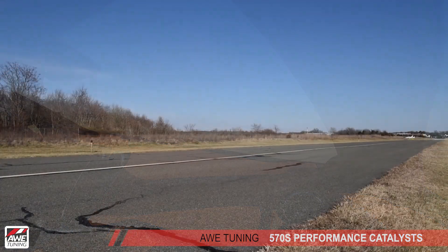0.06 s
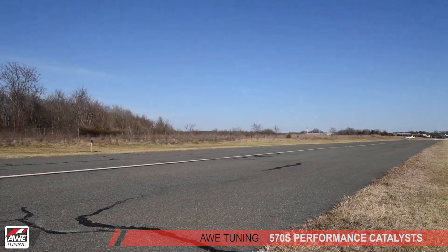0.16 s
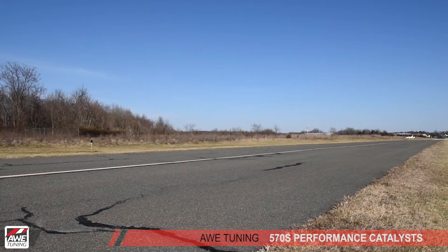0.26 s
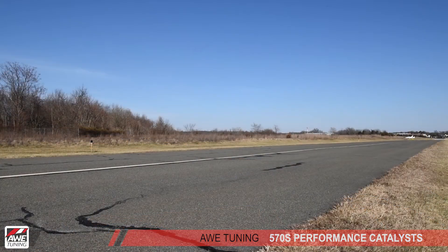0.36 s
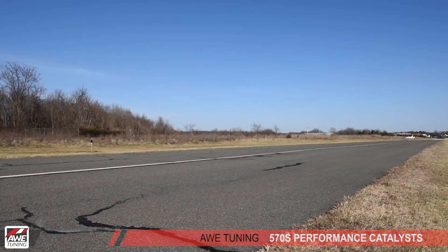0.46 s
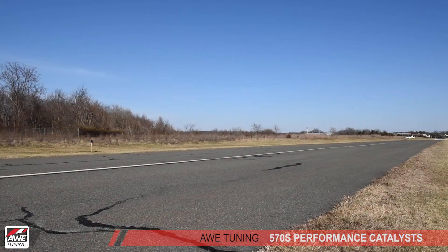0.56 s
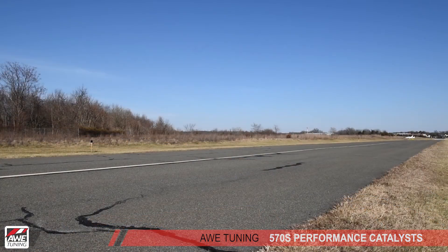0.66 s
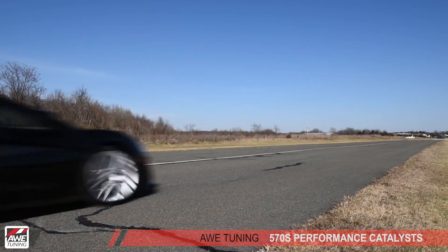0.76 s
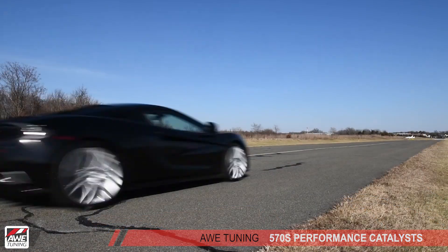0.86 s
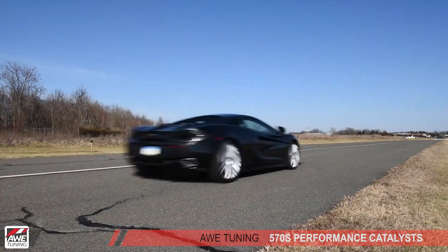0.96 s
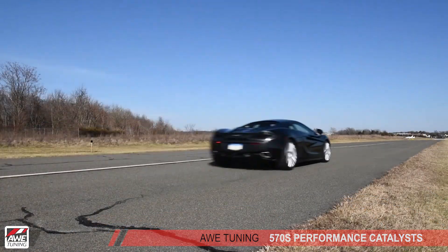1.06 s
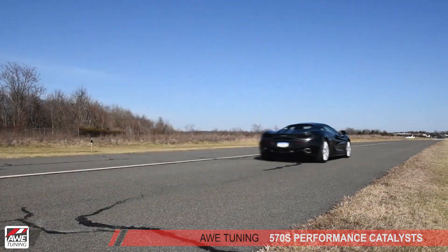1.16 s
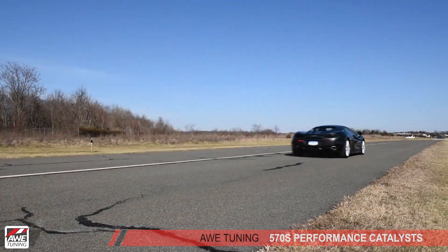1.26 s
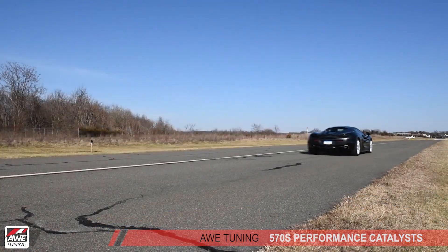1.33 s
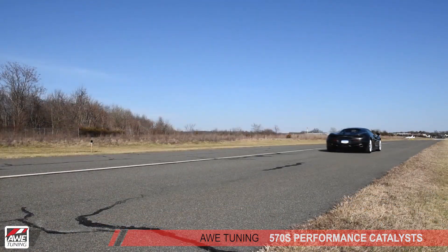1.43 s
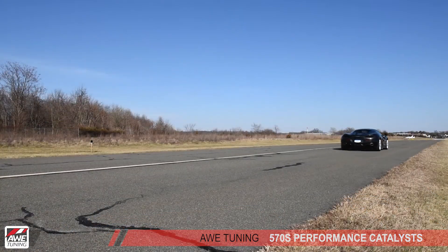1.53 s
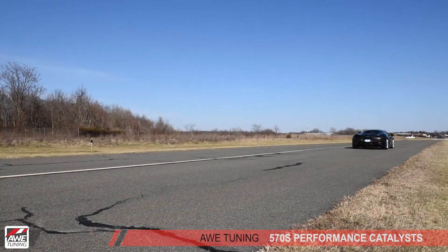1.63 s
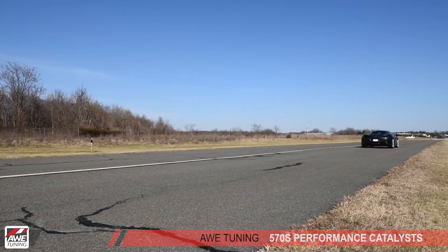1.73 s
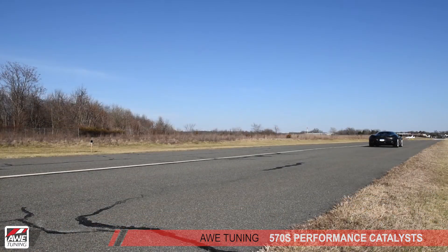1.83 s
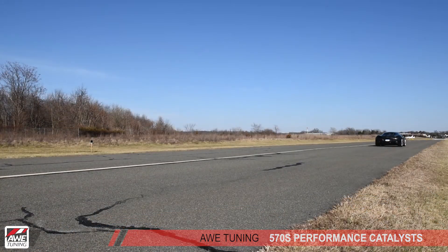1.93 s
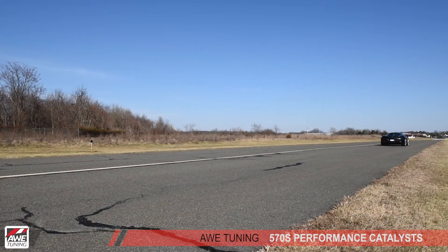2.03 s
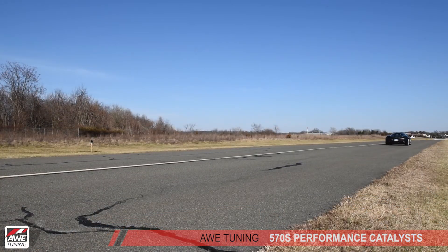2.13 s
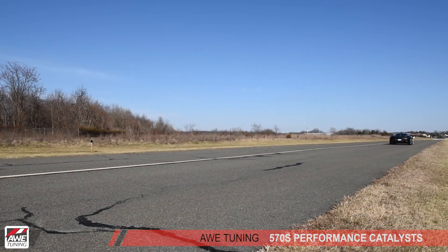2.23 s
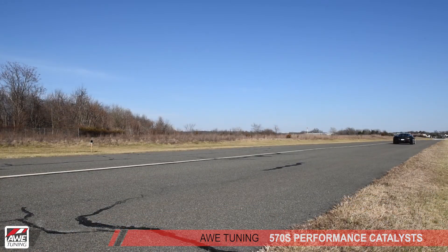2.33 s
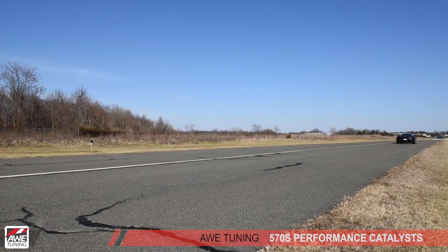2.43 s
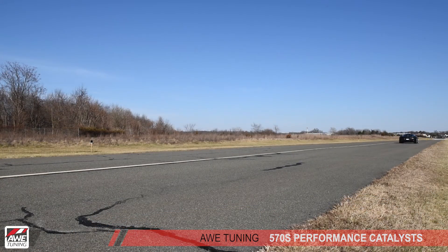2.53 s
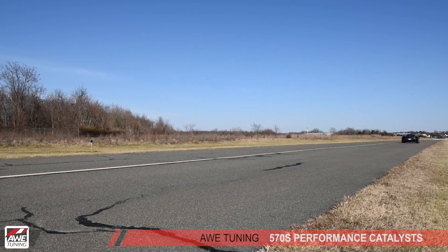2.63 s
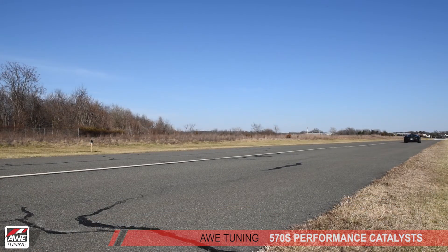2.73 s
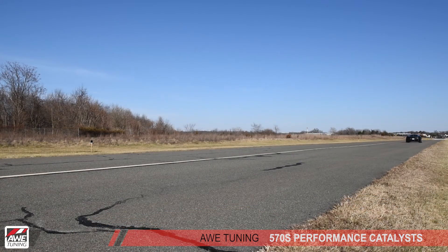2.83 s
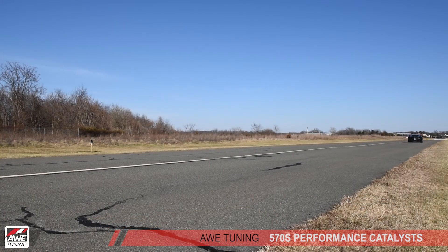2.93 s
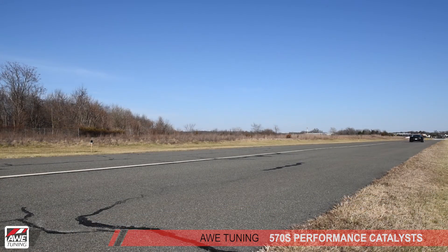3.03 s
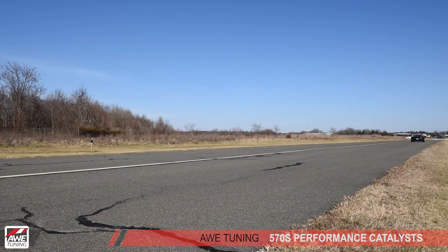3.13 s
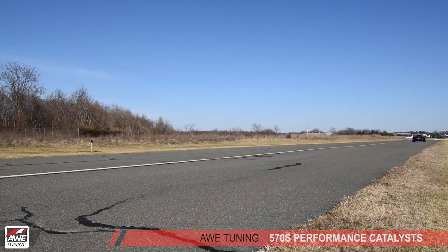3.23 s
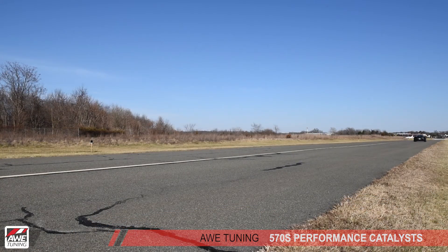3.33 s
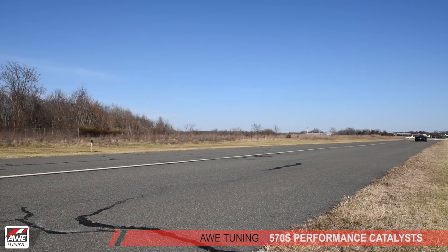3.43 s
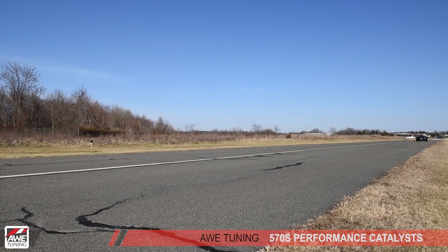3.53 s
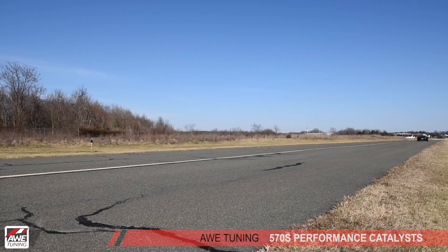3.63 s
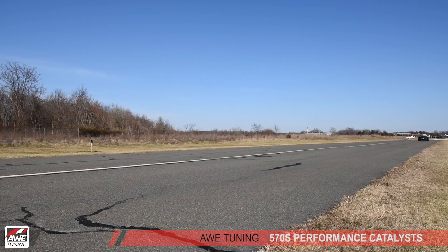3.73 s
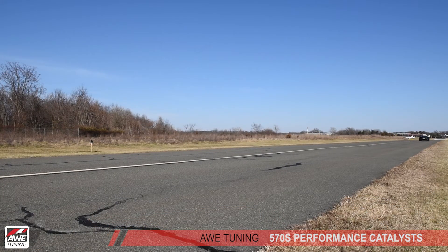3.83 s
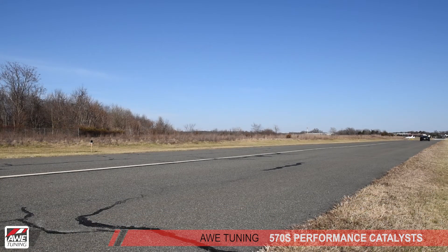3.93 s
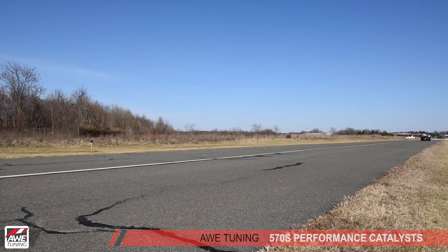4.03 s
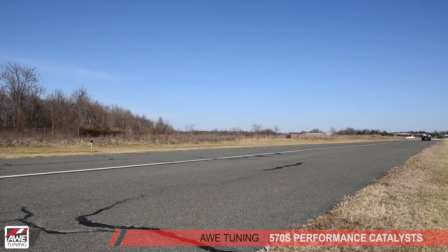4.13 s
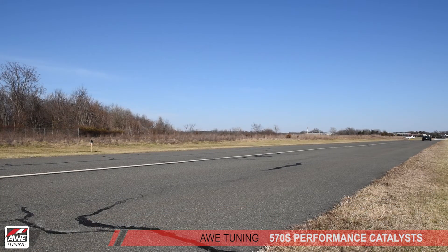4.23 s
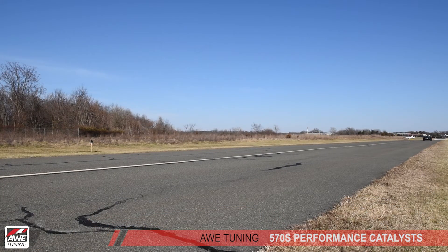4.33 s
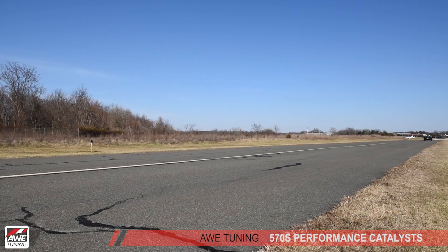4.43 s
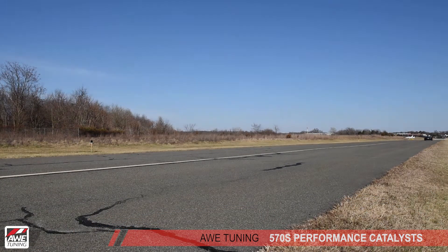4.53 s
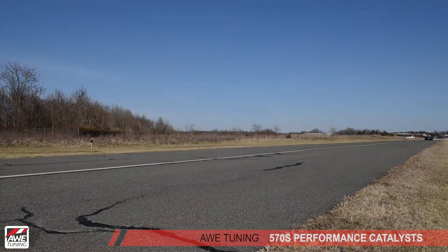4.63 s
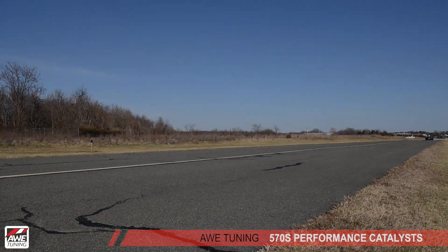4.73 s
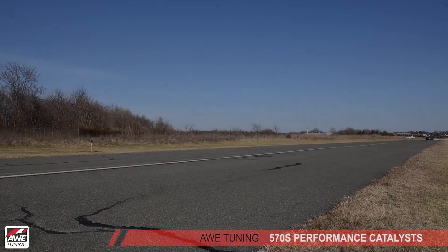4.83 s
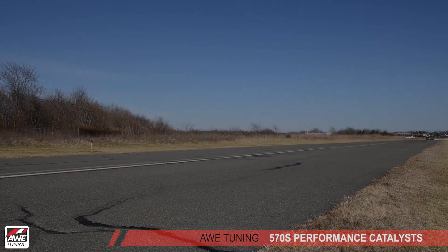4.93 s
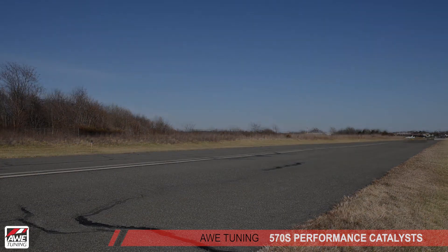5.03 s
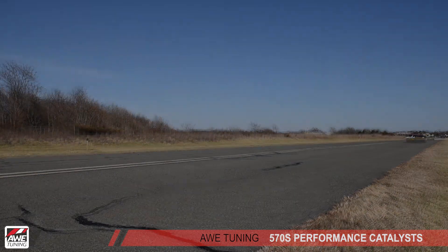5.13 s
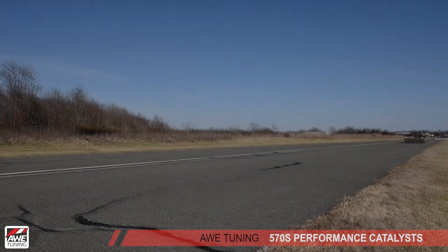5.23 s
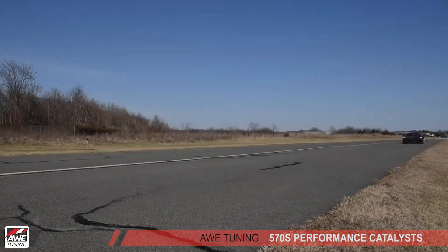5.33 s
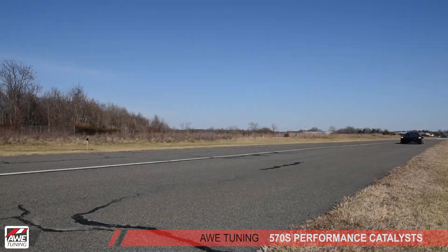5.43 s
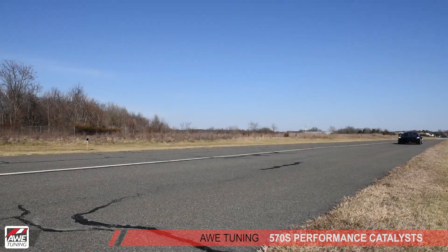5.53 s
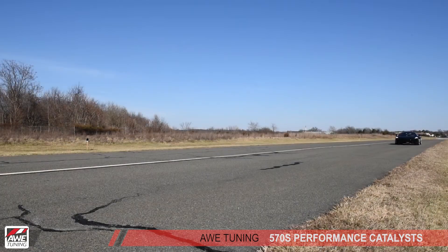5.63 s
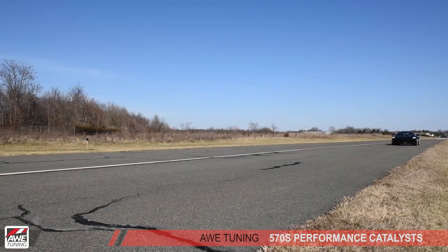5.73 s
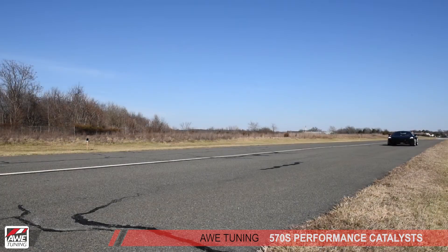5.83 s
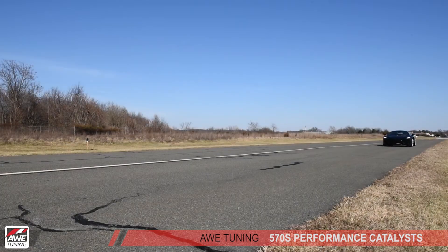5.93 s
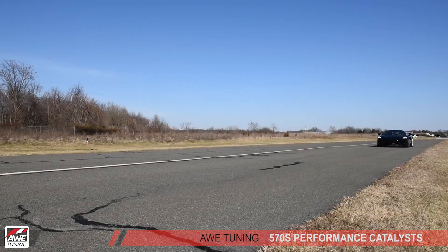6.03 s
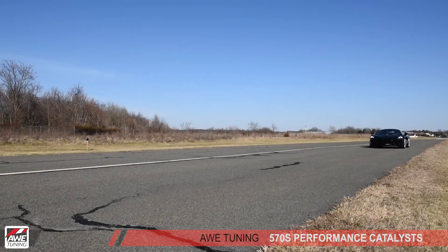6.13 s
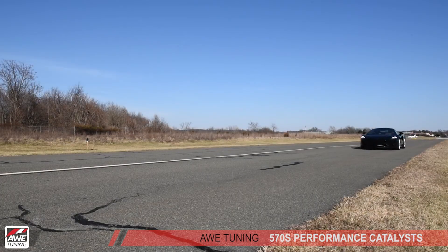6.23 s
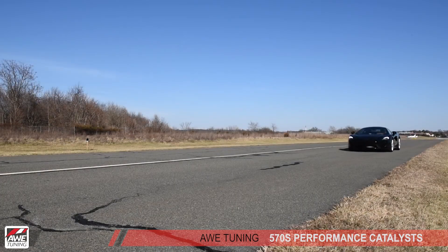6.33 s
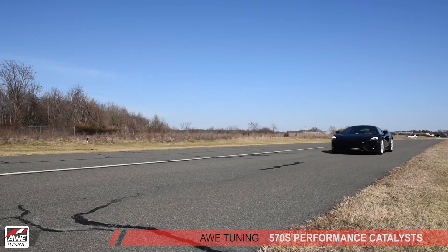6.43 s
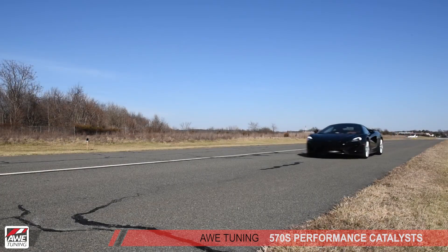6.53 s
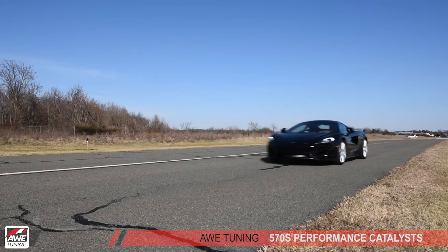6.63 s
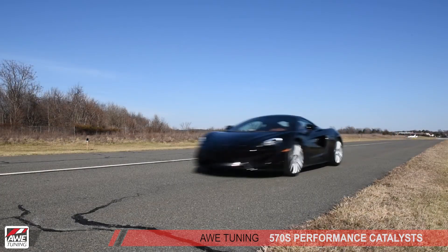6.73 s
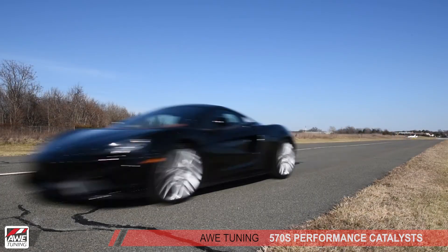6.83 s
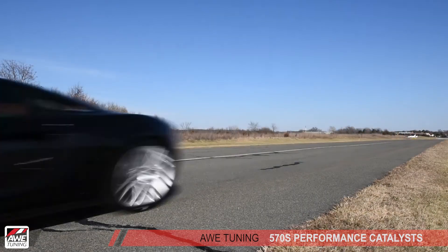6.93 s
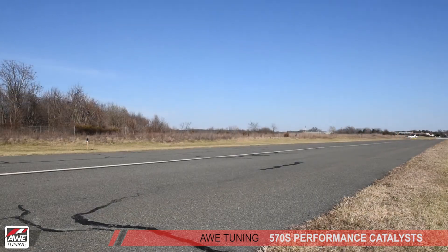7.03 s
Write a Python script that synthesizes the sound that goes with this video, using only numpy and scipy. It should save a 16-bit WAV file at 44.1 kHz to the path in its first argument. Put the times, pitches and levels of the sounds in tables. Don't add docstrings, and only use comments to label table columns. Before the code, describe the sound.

Close stereo microphones beside an empty open road. A previous engine note dies away, then a turbocharged sports car bursts past from the left with a deep exhaust thump, tyre rush and sharp crackles. Its rasping drone recedes, drops in note with a gear shift and fades to near quiet. It returns, climbing in pitch to a fierce howl, shifts with a bark and blasts by at the very end.

```python
import sys
import numpy as np
from scipy import signal
from scipy.fft import rfft, irfft, next_fast_len
from scipy.io import wavfile
from scipy.ndimage import uniform_filter1d, map_coordinates

SR = 44100
rng = np.random.default_rng(int(sys.argv[2]) if len(sys.argv) > 2 else 0)


def output_pcm(signal):
    pcm = np.clip(np.atleast_2d(signal).T, -1, 1) * 32767
    wavfile.write(sys.argv[1], SR, np.round(pcm).astype(np.int16))


def level_to_linear(level):
    exponent = np.asarray(level, float) / 20
    return 10 ** exponent


N = 311783


def unit(x):
    return x / np.sqrt(np.mean(x ** 2) + 1e-20)


def curves(rows):
    s, *cols = np.transpose(rows)
    return [np.interp(np.arange(N) / SR, s, c) for c in cols]


def wobble(rate):
    knots = rng.standard_normal(int(N * rate / SR) + 4)
    return map_coordinates(knots, [np.arange(N) * rate / SR])


def coloured(x, spectrum):
    m = next_fast_len(N + 8192)
    f, db = np.transpose(spectrum)
    gain = level_to_linear(np.interp(np.log(np.fft.rfftfreq(m, 1 / SR) + 1), np.log(f + 1), db))
    return unit(irfft(rfft(x, m) * gain, m)[..., :N])


def spread(alike, patchy_db):
    z = signal.stft(rng.standard_normal((2, N)), nperseg=512)[2]
    patches = uniform_filter1d(rng.standard_normal(z.shape[1:]), size=4, axis=0)
    patches = uniform_filter1d(patches, size=22, axis=1)
    a, b = signal.istft(z * level_to_linear(patchy_db * unit(patches)), nperseg=512)[1][:, :N]
    turn = np.arccos(np.clip(alike, -1, 1)) / 2
    return np.cos(turn) * a + np.sin(turn) * np.array([b, -b])


def car(drive, law, path, shift, uneven, upper, roar, hiss, start, lean, abeam, scatter_db, pulsed, patchy_db):
    # (time [s], length [s], jet noise gain [dB])
    surges = [(1.439, 0.02, 3), (1.597, 0.033, 8), (1.777, 0.024, 3.5), (1.964, 0.12, 8),
              (2.058, 0.023, 3.5), (2.326, 0.036, 3), (2.561, 0.026, 8.5), (2.632, 0.029, 10.5),
              (4.36, 0.042, 2.5), (4.621, .1, -0.5)]
    # (time [s], note left-right [dB], noise left-right [dB])
    bearing = [(0.0, 0, 4), (0.7, -1.2, 8), (1.16, -1, -1), (1.45, 2, -3.5), (2.8, -2.3, -5), (5.4, .3, -6),
               (6.28, -2, -3.5), (6.5, -0.2, -6.5), (7.07, 1.5, 0.2)]
    # (frequency [Hz], density [dB per Hz])
    rasp_colour = [(1120, -25), (1900, -5), (2340, -2), (3330, -2.5), (4270, -8), (4600, -11),
                   (5980, -37.5), (10100, -120)]
    # (frequency [Hz], density [dB per Hz])
    rumble_colour = [(18, -46), (30, -17), (91, -0.5), (194, 0), (302, -10), (366, -9.5), (488, -14),
                     (642, -12.5), (800, -18.5), (1040, -66), (1760, -120)]

    t = np.arange(N) / SR
    side = np.array([[1], [-1]])
    hz, db2, db4, rasp_db = curves(drive)
    pass_s, pass_length_s, flare_s, flare_length_s, flare_db = path
    shift_s, shift_length_s, bark_db, thump_db, swap_db = shift

    along = (t - pass_s) / pass_length_s
    front = .5 - .5 * np.tanh(along)
    near_db = -10 * np.log10(1 + along ** 2)
    db1, db3, odd_db, even_db, rumble_db, roar_db, hiss_db = [
        db + ahead * front + a * near_db + b * (db4 + 40) + c * (rasp_db + 40)
        for db, ahead, a, b, c in law]
    hiss_db = hiss_db + flare_db * np.exp(-((t - flare_s) / flare_length_s) ** 2)

    def bark(late_s):
        attack = (t - shift_s - late_s) / .006
        release = 1 + (shift_s + late_s + shift_length_s - t) / .025
        return np.clip(np.minimum(attack, release), 0, 1)

    db1, db3 = db1 + bark_db * bark(0), db3 + bark_db * bark(0)
    rumble_db = rumble_db + thump_db * bark(.025)
    geared = np.clip((t - shift_s) / shift_length_s, 0, 1)
    odd_db, even_db = odd_db - swap_db * geared, even_db + swap_db * geared
    surge_db = sum(db * np.exp(-((t - s) / length) ** 2) for s, length, db in surges)
    rasp_db, hiss_db = rasp_db + 0.62 * surge_db, hiss_db + surge_db

    turns = np.cumsum(hz * (1 + 0.0018 * wobble(25))) / SR + start
    orders = [(1, db1), (2, db2), (3, db3), (4, db4)]
    orders += [(k, db2 + db + 2 * wobble(8)) for k, db in uneven]
    for family, family_db in zip(upper, (odd_db, even_db)):
        orders += [(k, family_db + db + 2.1 * wobble(9)) for k, db in family]
    behind = np.clip((t - abeam) / 0.13, 0, 1)
    note = 0
    for k, db in orders:
        level = level_to_linear(db + 0.31 * wobble(30))
        unlocked = (k > 2) * behind * rng.uniform(-np.pi, np.pi)
        scattered = 0.22 * side * wobble(6.6)
        note = note + level * np.cos(2 * np.pi * k * turns - lean * k * k + unlocked + scattered)

    turns = turns + 0.028
    gusts = 0.55 * wobble(11)
    rasp = blowdowns(turns, scatter_db, pulsed) * spread(.62, patchy_db)
    jet = level_to_linear(rasp_db + gusts) * coloured(rasp, rasp_colour)
    near = coloured(blowdowns(turns, scatter_db, pulsed) * spread(.5, patchy_db), hiss)
    far = np.clip((-51.5 - hiss_db) / 22, 0, 1) * (abeam > 0)
    jet += level_to_linear(hiss_db + gusts) * ((1 - far) * near + far * unit(uniform_filter1d(near, size=3)))
    roaring = blowdowns(turns, scatter_db, 0.3 * pulsed) * spread(0.52, patchy_db)
    jet += level_to_linear(roar_db + 0.39 * gusts) * coloured(roaring, roar)
    road = level_to_linear(rumble_db + 4.5) * coloured(spread(0.99, patchy_db=3.0), rumble_colour)

    since = t - drive[0][0] + (drive[0][0] < .01)
    left = drive[-1][0] - t + (drive[-1][0] > 7)
    on = np.clip(np.minimum(since, left) / .1, 0, 1)
    note_pan_db, noise_pan_db = curves(bearing)
    tonal = (np.sqrt(2) * note + road) * level_to_linear(side * note_pan_db / 2)
    return on * (tonal + jet * level_to_linear(side * noise_pan_db / 2))


def blowdowns(turns, scatter_db, pulsed):
    cylinders = [2.5, -1.5, .5, -1.5]
    shot = turns.astype(int)
    chance = rng.uniform(-1.7, 1.7, shot[-1] + 1)[shot]
    sizes = level_to_linear(np.take(cylinders, shot % len(cylinders)) + scatter_db * chance)
    u = (turns % 1) / 0.1
    return unit(np.abs(1 - pulsed) + pulsed * 3 * sizes * u * np.exp(1 - u))


def crackles():
    # (time [s], peak level [dB], centre [Hz])
    single = [(0.0425, -43.5, 3220), (0.1291, -45.5, 3380), (0.2149, -41.5, 3150), (0.606, -31.5, 9740),
              (0.8476, -25, 1920), (0.8606, -27.5, 902), (0.8706, -31.5, 1150), (0.882, -27.5, 974),
              (0.8935, -16.5, 6150), (0.907, -10.5, 6760), (0.9858, -19.5, 2176), (1.048, -19.5, 2426),
              (1.1983, -13.5, 3800), (1.3069, -21, 1150), (1.3776, -24.5, 980), (1.598, -32, 7000),
              (1.7272, -29, 1117), (1.7389, -30.5, 1143), (1.7746, -18, 3070), (1.9109, -27.5, 1775),
              (1.9571, -29.5, 6810), (2.0028, -22, 2940), (2.6263, -33, 6955), (5.965, -52.5, 10400),
              (6.2317, -46.5, 9870), (6.912, -7.5, 668), (6.9135, -9, 1350), (6.918, -8, 1320),
              (6.9315, -12.5, 1250), (6.949, -5.5, 1150)]
    out = np.zeros((2, N + SR))
    t = np.arange(SR // 40) / SR
    spit_band = signal.butter(2, [2500, 9000], "bandpass", fs=SR, output="sos")
    for s, db, hz in single + knocks():
        shape = level_to_linear(db - 60 * t / 0.025) * (1 - np.exp(-t / .0004))
        hiss = rng.standard_normal((3, len(t)))
        ring = np.sin(2 * np.pi * hz * t + np.cumsum(0.15 * hiss[0]))
        spit = signal.sosfilt(spit_band, hiss[1:])
        first = round(s * SR)
        out[:, first:first + len(t)] += shape * (ring + .3 * spit)
    return out[:, :N]


def knocks():
    count, first_s, cycle_s, quickens_s = 23, 1.1634, .04799, 7.5e-5
    k = np.arange(count)
    chance = rng.standard_normal((count, 2))
    s = first_s + k * (cycle_s - k * quickens_s)
    db = -18 - 1.04 * k + 2.5 * chance[:, 0]
    hz = 1086 * (1 + 0.032 * chance[:, 1])
    return list(zip(s, db, hz))


def sweep():
    centre_s, length_s, level_db = 1.05, .2, -33
    centre_hz, climb_hz_per_s, width_hz = 2540, 2500, 900
    t = np.arange(N) / SR - centre_s
    hz = np.clip(centre_hz + climb_hz_per_s * t, 0, 4 * centre_hz)
    phase = 2 * np.pi * np.cumsum(hz) / SR
    band = [wobble(width_hz) * np.cos(phase) + wobble(width_hz) * np.sin(phase) for _ in range(2)]
    return level_to_linear(level_db) * np.exp(-(t / length_s) ** 4) * unit(np.array(band))


def road_notch(x):
    notch_hz, width_hz, share = 4464, 210, .85
    b, a = signal.iirpeak(notch_hz, notch_hz / width_hz, fs=SR)
    return x - share * signal.lfilter(b, a, x)


def wind():
    # (time [s], peak level [dB], rise [dB per s], fall [dB per s])
    wake = [
        (0.0, -27, 300, 60),
        (.92, -55, 25, 45),
        (6.96, -37.5, 170, 45),
    ]
    # (frequency [Hz], density [dB per Hz])
    buffet = [(12, -22.5), (25, -9), (50, 5.5), (80, -11), (150, -83)]
    t = np.arange(N) / SR
    pushes = sum(level_to_linear(db - rise * np.maximum(s - t, 0) - fall * np.maximum(t - s, 0))
                 for s, db, rise, fall in wake)
    breeze = level_to_linear(-70.5 + 1.5 * wobble(6.1))
    return (pushes + breeze) * coloured(spread(0.98, patchy_db=-2.5), buffet)


def open_fields():
    # (frequency [Hz], density [dB per Hz])
    still_air = [(20, -22), (140, -3), (400, -28.5), (1000, -28), (2500, -39.5), (5000, -51),
                 (10000, -64.5), (12500, -76.5)]
    return level_to_linear(-58) * coloured(spread(0.95, patchy_db=0.4), still_air)


def spaced_pair(x):
    # (time [s], lag [samples])
    left_lag = [(0, -10), (.7, -7), (.95, -1), (1.15, 3.5), (1.5, 5), (6.6, 6), (6.9, 4), (7.07, 1)]
    lag, = curves(left_lag)
    left = map_coordinates(x[0], [np.arange(N) - lag / 2], mode="mirror")
    right = map_coordinates(x[1], [np.arange(N) + lag / 2], mode="mirror")
    return np.array([left, right])


def scene():
    # (time [s], bank firing rate [Hz], order 2 = note [dB], order 4 = octave [dB], jet rasp [dB])
    earlier = [(0.0, 78.1, -31, -36.5, -57.5), (0.12, 75.16, -29.5, -42.5, -56.5),
               (0.292, 72.4, -27.5, -44.5, -56.5), (0.5, 68.6, -37, -44, -66)]
    leaving = [(0.25, 88.54, -30, -38, -59), (0.414, 90.2, -41, -46.5, -54), (0.586, 90.7, -25, -33.5, -47),
               (0.726, 91.7, -27.5, -35, -41.5), (0.87, 88.57, -13.5, -28, -32.5),
               (0.96, 85.1, -25, -22.5, -34), (1.034, 84.56, -35.5, -23, -32.5),
               (1.2, 84.1, -29.5, -31, -29), (1.36, 85.2, -31.5, -39.5, -35.5),
               (1.62, 86.27, -30.5, -36.5, -40), (2.02, 88.1, -29.5, -41, -47.5),
               (2.28, 90.2, -30.5, -42.5, -49), (2.82, 91.36, -35, -52, -58.5),
               (2.9, 81.8, -35.5, -40.5, -60), (3.0, 72.5, -38.5, -61, -63), (3.6, 73.44, -44, -62.5, -69),
               (4.74, 76.7, -42.5, -56.5, -65.5), (5.25, 76.76, -56, -63, -93)]
    coming = [(5.1, 76.13, -59.5, -55.5, -97.5), (5.346, 80.46, -56.5, -46, -86.5),
              (5.538, 86.14, -43.5, -36, -75), (5.918, 101.7, -34, -43.5, -64),
              (6.3, 117.7, -35.5, -51, -50.5), (6.466, 130.7, -39, -53, -44.5),
              (6.64, 125.5, -36.5, -42, -39), (6.72, 132.9, -37, -55, -34.5),
              (6.856, 134.3, -36.5, -23, -28.5), (6.882, 130.2, -23, -29.5, -26),
              (6.908, 116.7, -34, -21.5, -24), (6.948, 101.1, -14, -28, -24),
              (6.998, 101.1, -7.5, -20, -24), (7.04, 97.4, -9, -18.5, -23.5),
              (7.07, 95.4, -9.5, -33.5, -25)]
    # (level [dB], extra from the front [dB], per nearness [dB/dB], per octave [dB/dB], per rasp [dB/dB])
    law_earlier = [(-27.5, 5, 1.5, 0.0011, 0.068), (-44, 2, 1.5, 0, 0.041), (-60, -2, 0, 0, 0),
                   (-64, 0, 7, 0.0041, 0), (-33, 0.5, 0.75, 0.0052, 0.17), (-37, -7, 1, 0, 0.5),
                   (-56.5, -2, 0, 0, .6)]
    law_leaving = [(-19, 0.2, 1.63, .01, .01), (-30, 1.2, 1.31, .1, 0.011), (-51, -3, -0.33, .9, 0.46),
                   (-43, 4, 0.87, .01, 0.37), (-32.5, 2, 1.04, .01, 0.24), (-38, 4, 0.17, .01, 0.88),
                   (-43.5, 0.5, -0.036, .01, 1.225)]
    law_coming = [(-33, 3, 0.95, .01, 0.016), (-46, -1.8, .01, .01, 0.57), (-45.5, -5.5, .01, .01, .9),
                  (-44, -5.5, 0.0092, 0.84, .4), (-39.5, -1.5, .01, .01, 0.48), (-36, 1, .01, .01, 0.97),
                  (-46.5, 1, 0.011, .01, 1.055)]
    # (abeam [s], time scale [s], hiss flare [s], flare length [s], flare gain [dB])
    path_earlier = (0, .15, .25, .15, 3)
    path_leaving = (0.89, .15, .894, 0.054, 11)
    path_coming = (6.95, 0.088, 7.07, .08, 11.7)
    # (time [s], length [s], bark of orders 1 and 3 [dB], thump [dB], odd-to-even swap [dB])
    shift_earlier = (.1, .15, 0, 0, 0)
    shift_leaving = (2.83, 0.15, 1.7, 6.2, 8.06)
    shift_coming = (6.876, .034, 20, 17, -4)
    # (order [of bank rate], level under order 2 [dB])
    uneven = [(1.25, -17), (2.751, -27), (3.25, -27), (4.75, -28.5)]
    uneven_coming = [(1.5, -13), (2.5, -27), (3.5, -23), (4.5, -32)]
    # (order [of bank rate], level [dB])
    upper_leaving = [
        [(5, -6), (7, -1), (9, -19), (10, -10.5)],
        [(6, 4), (8, -7)],
    ]
    upper_coming = [
        [(5, -14.5), (6, 3), (7, -9)],
        [(8, -0.5), (10, -18)],
    ]
    # (frequency [Hz], density [dB per Hz])
    roar_leaving = [(350, -29), (600, -9), (634, -1.5), (770, -12), (805, -4), (1030, 1.5), (1840, -10.5),
                    (2200, -9), (2860, -25.5), (4840, -120)]
    roar_coming = [(350, -11), (600, -7), (809, -10.5), (927, -8), (1020, -2), (1340, -1), (1540, -5),
                   (2200, -12.5), (2860, -47.5), (4840, -120)]
    hiss_leaving = [(2650, -34), (4500, -1.5), (5100, -4.5), (6990, -2.5), (8090, -5.5), (9400, -7),
                    (11000, -17), (12700, -19.5), (15500, -32.5)]
    hiss_coming = [(2650, -44.5), (4500, -2), (5100, -5.5), (6140, 0), (8470, -3.5), (10000, -6.5),
                   (13600, -22), (15500, -32.5)]

    x = car(earlier, law_earlier, path_earlier, shift_earlier, uneven, ([(4.3, -18)], [(5.2, -13)]),
            roar_leaving, hiss_leaving, start=0.437, lean=0.65, abeam=0,
            scatter_db=6.5, pulsed=0.18, patchy_db=-1.0)
    x -= car(leaving, law_leaving, path_leaving, shift_leaving, uneven, upper_leaving,
             roar_leaving, hiss_leaving, start=0.702, lean=0.068, abeam=0.84,
             scatter_db=4.5, pulsed=0.25, patchy_db=1.7)
    x += car(coming, law_coming, path_coming, shift_coming, uneven_coming, upper_coming,
             roar_coming, hiss_coming, start=.3, lean=0.1, abeam=8,
             scatter_db=5.5, pulsed=0.14, patchy_db=0.9)
    x = road_notch(x)
    x += sweep() + crackles() + wind() + open_fields()
    return spaced_pair(x)


def low_pass(x):
    return signal.sosfilt(signal.butter(12, 15690, fs=SR, output="sos"), x)


def record(dry):
    dry = dry * np.clip(np.arange(N) / SR / .004, 0, 1)
    held = dry / (1 + np.abs(dry / 1.1) ** 6) ** (1 / 6)
    return low_pass(held)


dry = scene()
out = record(dry)
output_pcm(out)
```